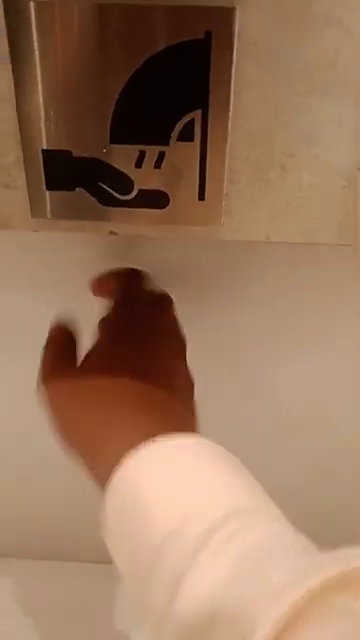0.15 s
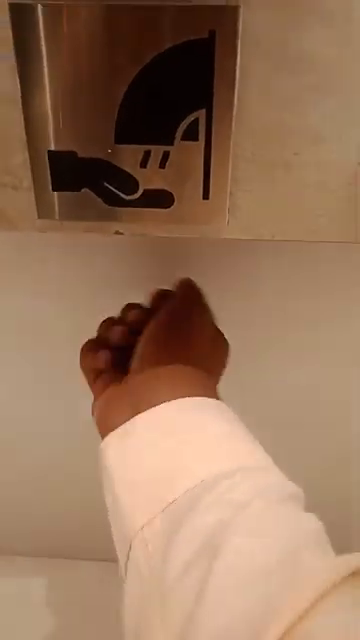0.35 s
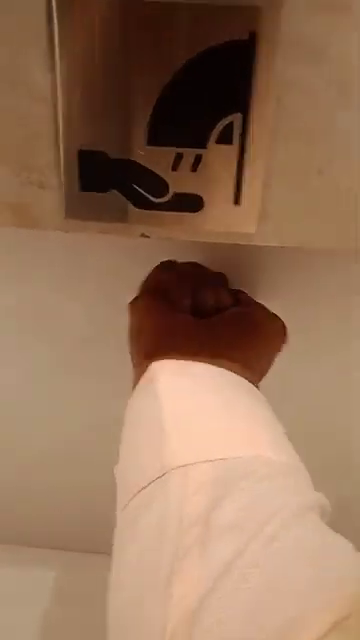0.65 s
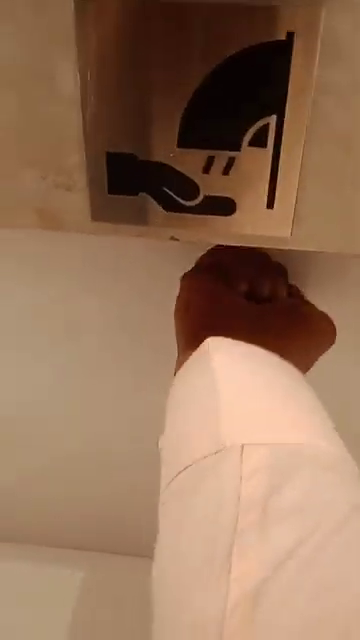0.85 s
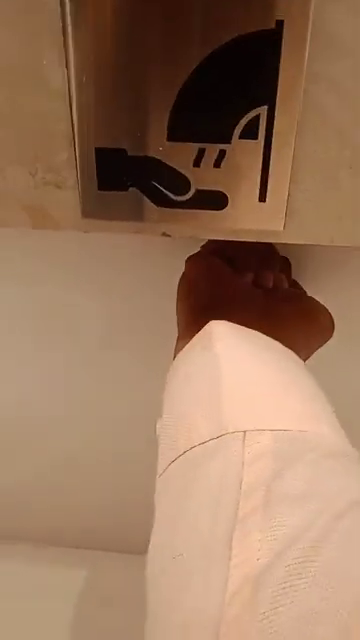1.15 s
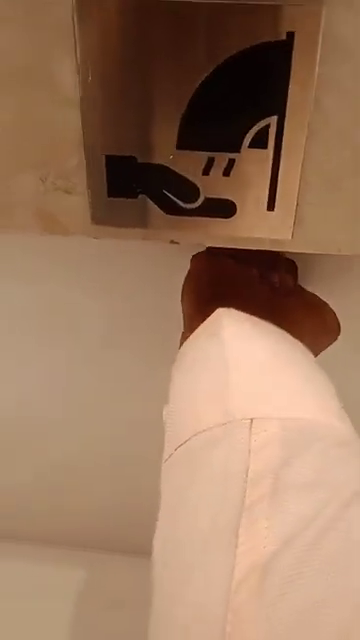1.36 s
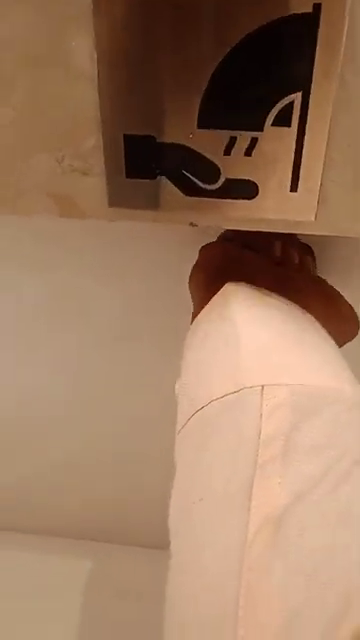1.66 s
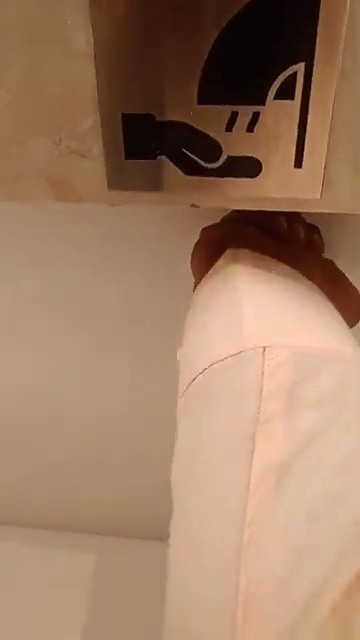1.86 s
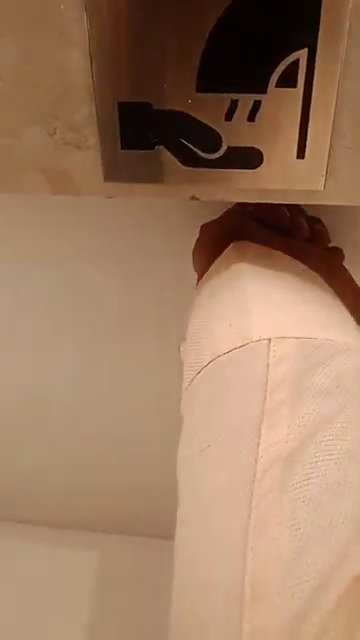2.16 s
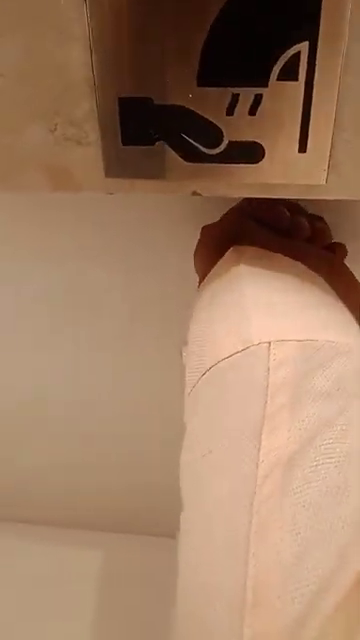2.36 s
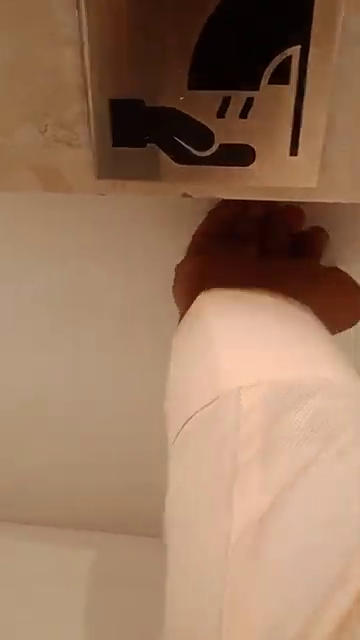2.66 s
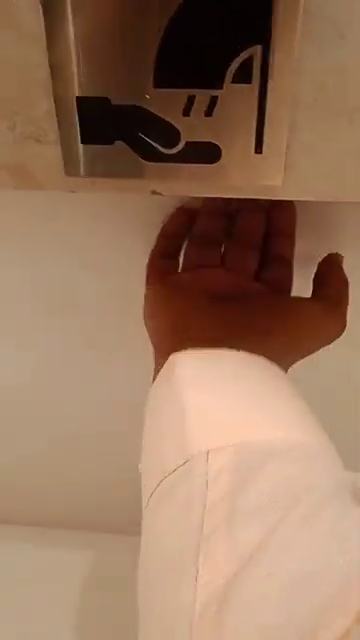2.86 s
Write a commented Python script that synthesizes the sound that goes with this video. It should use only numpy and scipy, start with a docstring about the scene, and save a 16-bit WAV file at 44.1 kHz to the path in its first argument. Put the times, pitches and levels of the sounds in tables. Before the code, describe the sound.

An electric hand dryer spins up close to a mono phone microphone in a tiled washroom. A faint low buzz leads a quickly climbing whine while air builds to a full roar by about 1 second. A breathy hollow tone joins from 0.5 seconds, drifting lower around 1.4; a fluttering low hum enters after 1. The roar holds to the end at 3 seconds, slightly duller after 2.7 as the hollow fades.

```python
"""Tiled washroom, mono phone microphone, direct air sound 12 dB over the room: a recessed hand dryer spins up.
First the motor windings buzz at twice the mains rate while they pull hard; the nine-blade impeller's whine climbs
from 1.5 to 3.9 kHz at blade rate as turbulent air builds to a roar through the recess resonances, with jet hiss.
From about half a second a hand under the outlet makes a breathy hollow, a noise-broadened tone whose pitch drifts;
after one second the shaft hum, a tone once a turn, sets in, and near the end the hollow fades."""
import sys
import numpy as np
from scipy import signal
from scipy.fft import rfft, irfft
from scipy.io import wavfile
from scipy.ndimage import uniform_filter1d

SR = 44100
rng = np.random.default_rng(int(sys.argv[2]) if len(sys.argv) > 2 else 0)


def master(y):
    """Save y as 16-bit WAV."""
    cut = np.clip(np.atleast_2d(y).T, -1, 1)
    pcm = np.round(cut * 32767)  # scale
    wavfile.write(sys.argv[1], SR, pcm.astype(np.int16))


def linear_from_db(decibels):
    """Turn decibels (scalar or array-like) into linear amplitude factors; 0 gives 1."""
    return 10 ** (np.asarray(decibels, float) / 20)


N = 133182  # samples, about 3.02 s


def curve(table, col=1):
    """A table column as a control signal, its corners rounded over 20 ms."""
    rows = np.array(table, float)
    line = np.interp(np.arange(N) / SR, rows[:, 0], rows[:, col])
    return uniform_filter1d(line, size=882, mode="nearest")


def flutter(width_hz):
    """Complex noise of the given bandwidth, rms 1: it ruffles a tone's level and phase."""
    noise = rng.standard_normal(N) + 1j * rng.standard_normal(N)
    lowpass = signal.butter(2, width_hz / 2, fs=SR, output="sos")
    slow = signal.sosfilt(lowpass, noise)
    return slow / np.std(slow)


def walk(rate):
    """Wandering level: random values held 1 / rate s and slewed twice; spread near 1."""
    hold = int(SR / rate)
    steps = np.repeat(rng.standard_normal(N // hold + 1), hold)
    slewed = uniform_filter1d(uniform_filter1d(steps, hold), hold)
    return 1.3 * slewed[:N]


# impeller speed as blade-pass rate: time_s, pitch_hz
BLADE_RATE = [(0, 1500), (.1, 2040), (.22, 2460), (.29, 2675), (.44, 3030), (.58, 3335), (.66, 3450),
              (.8, 3605), (.94, 3706), (1.09, 3770), (1.31, 3818), (1.6, 3846), (1.85, 3854), (2.1, 3861),
              (2.6, 3865), (3.02, 3869)]
# whine, swelling where the housing resonates and as the hand moves: time_s, level_db (rms before ruffling)
WHINE_LEVEL = [(0, -80), (.175, -76), (.2, -60), (.22, -56), (.26, -54), (.28, -56), (.3, -53), (.35, -55),
               (.39, -64), (.44, -43), (.47, -50), (.51, -62), (.56, -45), (.65, -48), (.69, -53),
               (.76, -49), (.81, -54), (.86, -47), (.94, -45), (1.02, -48), (1.12, -46), (1.21, -48),
               (1.27, -49), (1.31, -45), (1.34, -48), (1.365, -56), (1.39, -48), (1.45, -52), (1.48, -45),
               (1.5, -51), (1.52, -47), (1.55, -58), (1.6, -43), (1.67, -43), (1.72, -51), (1.77, -44),
               (1.85, -45), (1.92, -53), (2.02, -49), (2.14, -46), (2.29, -41), (2.44, -45), (2.5, -43),
               (2.7, -43), (2.76, -46), (2.9, -45), (2.925, -57), (2.98, -50), (3.02, -54)]
# unevenness of the whine, strongest while the impeller speeds up: time_s, share (0-1)
WHINE_UNEVENNESS = [(0, .5), (.55, .45), (.7, .3), (3.02, .3)]
# second harmonic of the whine: time_s, level_db (rms)
OCTAVE_LEVEL = [(0, -85), (.21, -80), (.24, -59), (.28, -60), (.31, -80), (1.3, -84), (1.6, -73),
                (2.0, -79), (3.02, -80)]
# shaft hum, setting in as the shaft rate nears a casing resonance: time_s, level_db (rms before ruffling)
SHAFT_LEVEL = [(0, -72), (.5, -60), (1.0, -56), (1.06, -41), (1.12, -44), (1.19, -38), (1.28, -46),
               (1.33, -38), (1.43, -35), (1.6, -39), (1.67, -36), (1.72, -39), (1.79, -36), (1.9, -44),
               (2.04, -46), (2.08, -37), (2.13, -44), (2.17, -37), (2.24, -35), (2.31, -46), (2.45, -36),
               (2.52, -44), (2.56, -40), (2.62, -49), (2.7, -42), (2.76, -46), (2.85, -42), (2.91, -37),
               (2.96, -45), (3.02, -37)]


def rotor():
    """Blade whine, its octave and the once-a-turn shaft hum, locked to one speed; flow ruffles whine and hum."""
    blades = 9
    turn = 2 * np.pi * np.cumsum(curve(BLADE_RATE)) / SR / blades  # shaft angle, rad
    whine_ruffle = 1 + curve(WHINE_UNEVENNESS) * flutter(45)
    whine = linear_from_db(curve(WHINE_LEVEL)) * whine_ruffle * np.exp(1j * blades * turn)
    octave = linear_from_db(curve(OCTAVE_LEVEL)) * np.exp(2j * blades * turn)
    hum_ruffle = 1 + 0.5 * flutter(40)
    hum = linear_from_db(curve(SHAFT_LEVEL)) * hum_ruffle * np.exp(1j * turn)
    return np.sqrt(2) * np.real(whine + octave + hum)


# air by register, used relative to each register's mean over the second half:
# time_s, then level_db around 200, 400, 900, 1600, 2300, 3000 and 5600 Hz
AIR_LEVELS = [(0, -58, -60, -62, -69, -73, -67, -63), (.1, -54, -56, -55, -64, -70, -66, -61),
              (.2, -49.5, -53, -49.5, -60, -65, -62, -57), (.3, -46, -49, -46, -55, -59, -56, -55),
              (.45, -43.5, -42, -41.5, -49, -52, -49, -51), (.6, -44, -43, -39, -44, -44, -46, -47),
              (.8, -43, -42, -36, -41, -40, -44, -45), (1, -42, -42, -36, -40, -40, -42, -44),
              (1.25, -46, -41, -35, -40, -39, -45.5, -44.5), (1.42, -46, -41, -35, -39.5, -39, -47, -44.5),
              (1.58, -46, -41, -35, -39, -38, -44, -45), (1.72, -46, -39.5, -35, -39.5, -40, -46, -46.5),
              (1.9, -46, -43, -35, -40, -42, -47, -47), (2.2, -47, -43, -34, -39, -41, -47, -47),
              (2.5, -46, -43, -34.5, -40, -42, -47, -46), (2.75, -45, -44, -36, -45, -47, -47, -47),
              (2.9, -43, -43, -36.5, -45, -47, -47, -46.5), (2.97, -41, -43, -36.5, -45, -47, -47, -46),
              (3.02, -38, -39, -36, -45, -46, -47, -46)]
# register centres: pitch_hz
REGISTER_CENTRES = [200, 400, 900, 1600, 2300, 3000, 5600]
# colour of the turbulence, only its shape counts: pitch_hz, density_db (per Hz)
AIR_SHAPE = [(40, -46), (70, -28), (95, -15.5), (200, -11), (270, -9), (371, -7.5), (590, -10), (740, -7.5),
             (900, -6.5), (990, -8.5), (1060, -9.5), (1180, -9.5), (1500, -11), (2010, -12), (2600, -14.5),
             (2940, -18.5), (3800, -19.5), (4000, -22.5), (4800, -26), (5600, -24.5), (6850, -24.5),
             (7400, -29.5), (7900, -44.5), (8400, -60.5), (9000, -80)]
# resonances of the recess and duct: pitch_hz, width_hz, height_db (peak over the colour, before RING_BUILD)
RECESS_RESONANCES = [(341, 14, 6), (428, 22, 4), (500, 16, 7.5), (521, 11, 8), (750, 30, 5), (826, 22, 5),
                     (1104, 40, 6), (1191, 60, 4), (1322, 60, 3), (1864, 30, 4), (1995, 25, 4),
                     (2050, 45, 4), (2212, 20, 5), (2490, 30, 5), (2735, 45, 4), (3119, 40, 3),
                     (3418, 50, 3), (4390, 90, 6.5), (4560, 50, 3), (5220, 60, 4), (5572, 60, 4),
                     (5840, 50, 4)]
# the resonances ring more as the flow builds: time_s, level_db
RING_BUILD = [(0, -4), (.5, -2.5), (.9, 0), (3.02, 0)]


def air():
    """Turbulence in third-octave bands plus recess resonances; all follow their register, each wanders in level."""
    steady_db = -31.5  # nominal rms of the settled air, before wandering
    surge_db, surges_per_s = 2.6, 14  # of the resonances
    f = np.arange(N // 2 + 1) * SR / N + 1  # 1 Hz up, so that the logarithm exists
    shape = np.array(AIR_SHAPE)
    colour = linear_from_db(np.interp(np.log(f), np.log(shape[:, 0]), shape[:, 1]))
    rings = []  # extra power of each resonance, relative to the colour
    for hz, width_hz, height_db in RECESS_RESONANCES:
        extra_power = linear_from_db(2 * max(height_db, 0)) - 1
        rings.append(extra_power / (1 + (2 * (f - hz) / width_hz) ** 2))
    turbulence = rfft(rng.standard_normal(N)) * colour
    ringing = rfft(rng.standard_normal(N)) * colour
    scale = linear_from_db(steady_db) / np.std(irfft(turbulence * np.sqrt(1 + sum(rings)), N))

    count = len(REGISTER_CENTRES)
    levels = np.array([curve(AIR_LEVELS, col=k + 1) for k in range(count)])
    levels = levels - levels[:, N // 2:].mean(axis=1, keepdims=True)

    def register(log_hz):
        """Level course in dB at a pitch, blended from the neighbouring registers."""
        weights = [np.interp(log_hz, np.log(REGISTER_CENTRES), row) for row in np.eye(count)]
        return weights @ levels

    out = 0
    third = np.log(2) / 3
    for step in range(24):
        centre = np.log(45) + step * third
        distance = np.clip((np.log(f) - centre) / third, -1, 1)
        share = np.cos(distance * np.pi / 2) ** 2  # neighbouring bands sum to 1
        wander_db = 1.8 if centre < np.log(3000) else 0.6
        band = irfft(turbulence * share, N)
        out = out + band * linear_from_db(register(centre) + wander_db * walk(7))
    for (hz, _, _), ring in zip(RECESS_RESONANCES, rings):
        # random phases make each resonance's noise its own
        turned = ringing * np.exp(2j * np.pi * rng.random(len(f)))
        tone = irfft(turned * np.sqrt(ring), N)
        level_db = register(np.log(hz)) + curve(RING_BUILD) + surge_db * walk(surges_per_s)
        out = out + tone * linear_from_db(level_db)
    return scale * out


# hollow between hand and outlet, blown by the jet: time_s, pitch_hz (centre), level_db (before the room)
HAND_HOLLOW = [(0, 2350, -85), (.45, 2350, -66), (.6, 2350, -45), (.9, 2400, -43), (1.12, 2460, -40),
               (1.3, 2420, -44), (1.42, 2100, -44), (1.58, 2060, -40), (1.75, 2050, -46), (2.1, 2070, -43),
               (2.45, 2000, -43), (2.62, 1950, -46), (2.75, 1950, -62)]


def hollow():
    """A breathy resonance, noise 240 Hz wide, whose pitch follows the gap between hand and outlet."""
    phase = 2 * np.pi * np.cumsum(curve(HAND_HOLLOW)) / SR
    breath = np.real(flutter(240) * np.exp(1j * phase))
    return np.sqrt(2) * linear_from_db(curve(HAND_HOLLOW, col=2)) * breath


# winding buzz: time_s, level_db (rms)
BUZZ_LEVEL = [(0, -79), (.06, -57.5), (.22, -52.5), (.28, -71), (.41, -59.5), (.6, -57), (.68, -63),
              (3.02, -67)]


def windings():
    """Twice-mains buzz of the motor windings: a sine at a fixed pitch."""
    buzz_hz = 101.3
    tone = np.sin(2 * np.pi * buzz_hz * np.arange(N) / SR)
    return np.sqrt(2) * linear_from_db(curve(BUZZ_LEVEL)) * tone


def room(x):
    """Tiled walls: a dense decaying noise tail after 4 ms."""
    t60_s, tail_db = 0.4, -12
    t = np.arange(SR // 2) / SR
    tail = rng.standard_normal(len(t)) * linear_from_db(-60 * t / t60_s) * (t > 0.004)
    tail = tail / np.sqrt(np.sum(tail ** 2))
    return x + linear_from_db(tail_db) * signal.fftconvolve(x, tail)[:N]


def scene():
    """Air and hollow sound in the room; rotor and windings are heard direct; both channels are alike."""
    mono = rotor() + room(air() + hollow()) + windings()
    return np.array([mono, mono])


def band_limit(x):
    """A steep low-pass at the top of the band."""
    return signal.sosfilt(signal.butter(12, 8500, fs=SR, output="sos"), x)


def record(dry):
    """A mono phone microphone with a steep elliptic cut at 8480 Hz."""
    steep_cut = signal.ellip(8, 0.2, 70, 8480, fs=SR, output="sos")
    finished = signal.sosfilt(steep_cut, dry)
    return band_limit(finished)


dry = scene()
out = record(dry)
master(out)
```